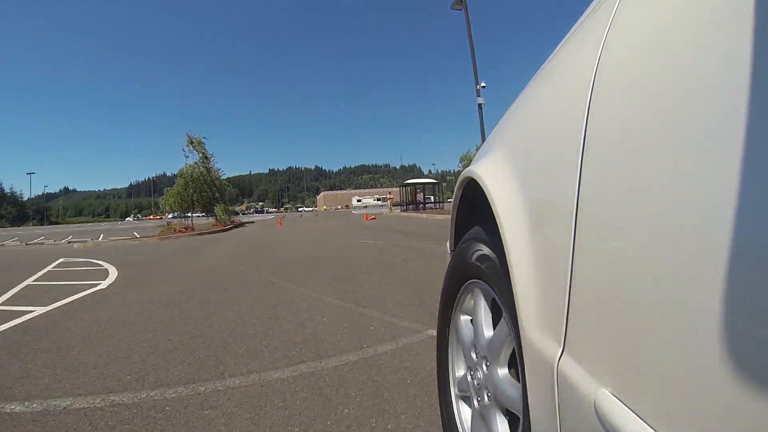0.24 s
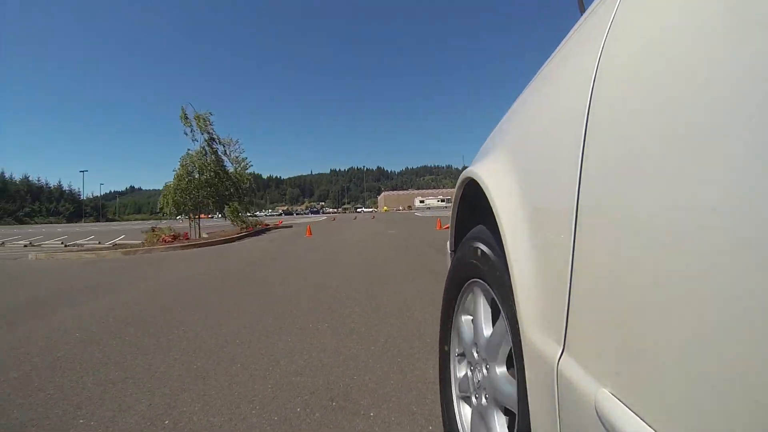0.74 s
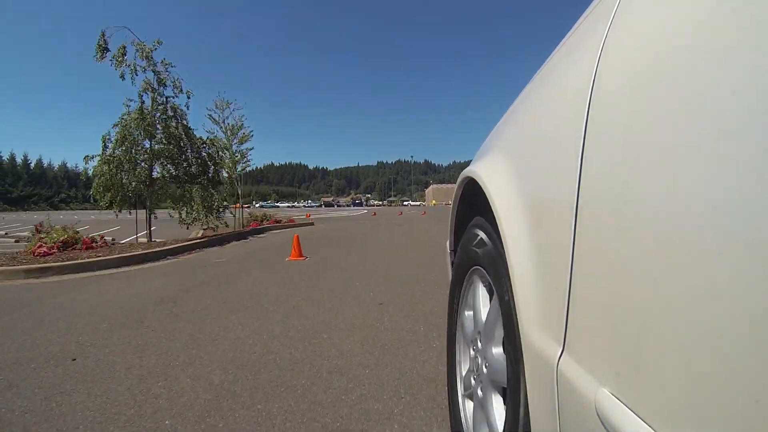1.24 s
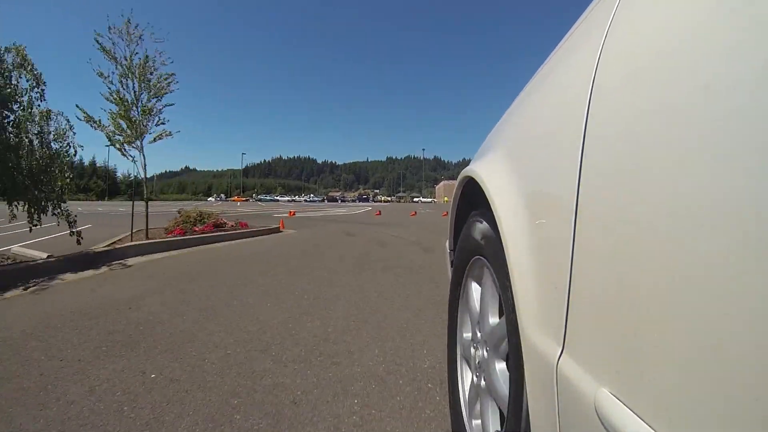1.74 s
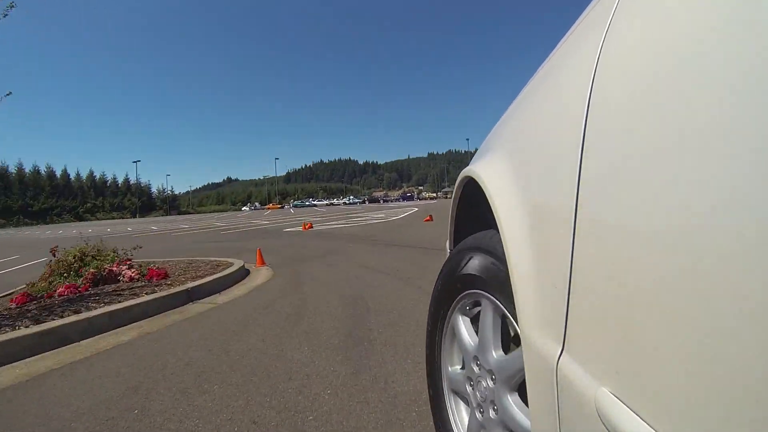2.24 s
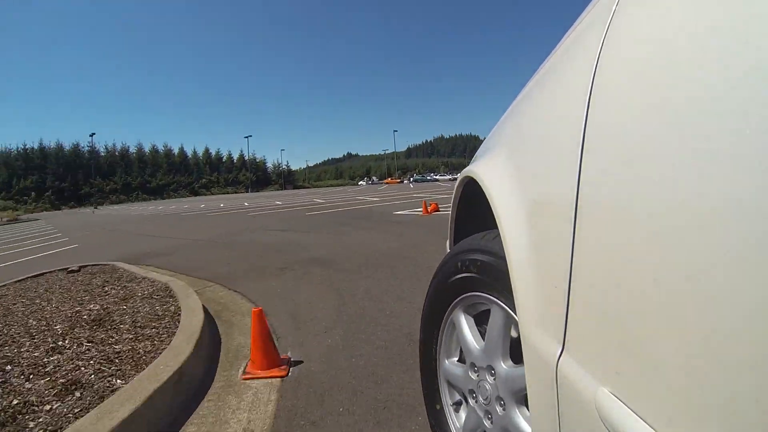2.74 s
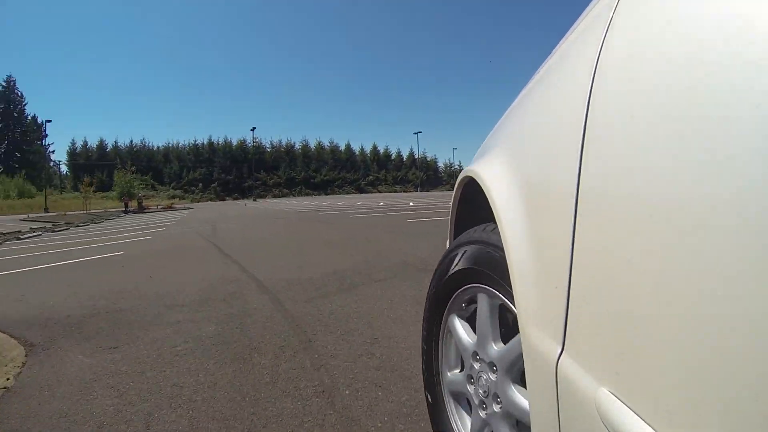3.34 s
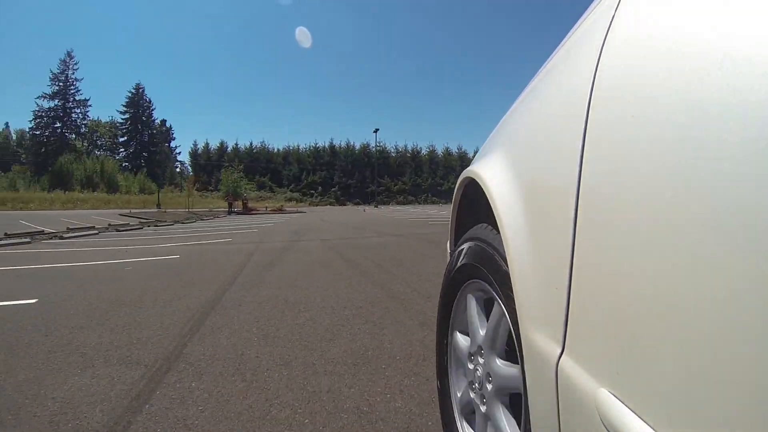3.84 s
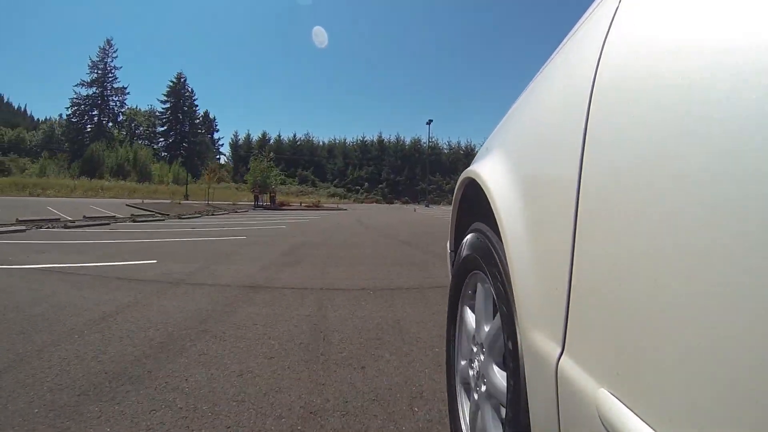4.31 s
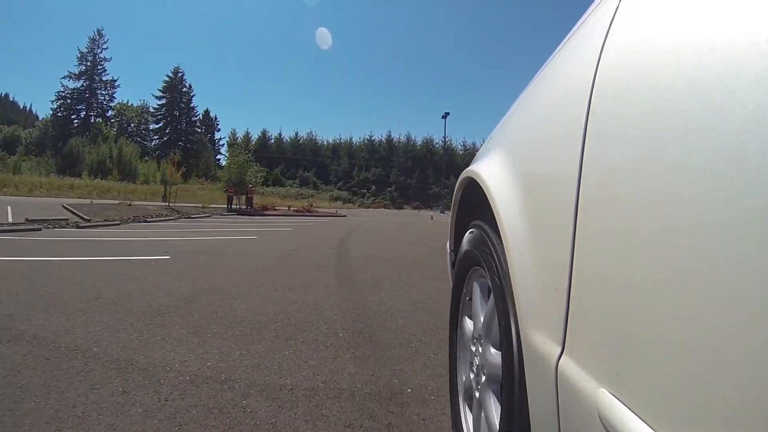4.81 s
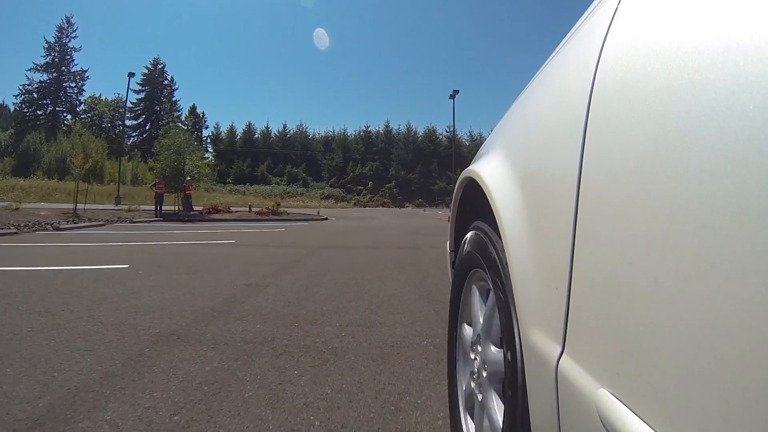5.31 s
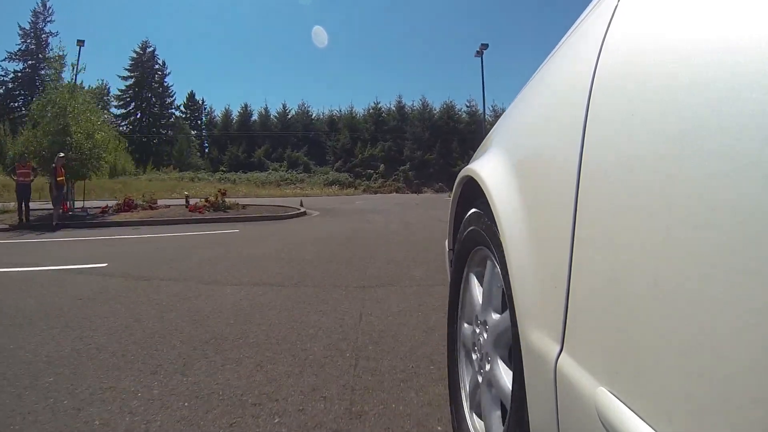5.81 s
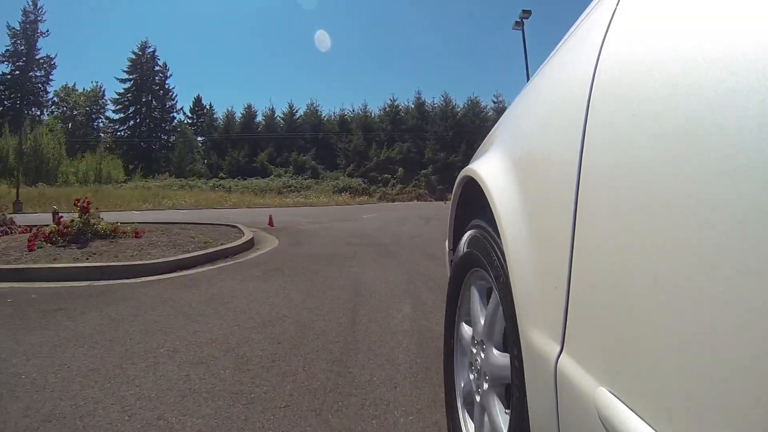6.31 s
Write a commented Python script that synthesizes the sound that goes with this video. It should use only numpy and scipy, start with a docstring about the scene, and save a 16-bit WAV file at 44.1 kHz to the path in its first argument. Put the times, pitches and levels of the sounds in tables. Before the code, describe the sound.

A car rushes around a paved lot, heavy low buffeting dominating, as tyres squeal briefly and an engine hum rises and falls on the straight.

```python
"""A deep, throbbing rumble under tread roar and air hiss, as a car is driven hard round cones on asphalt.
It is heard from a cased camera on the car's side, behind a front wheel.
The tyres squeal through one tight corner, then the engine pulls up the straight and grit ticks on the body.
Squeal and engine are wandering sine tones; the ticks are short decays of noise.
Roar, hiss, sand and wind are noise coloured by the case, and the mount is two noise-driven modes."""
import sys
import numpy as np
from scipy import signal
from scipy.fft import rfft, irfft, next_fast_len
from scipy.io import wavfile
from scipy.ndimage import uniform_filter1d

SR = 44100
rng = np.random.default_rng(int(sys.argv[2]) if len(sys.argv) > 2 else 0)


def int16_out(signal):
    """Quantize to a 16-bit WAV file."""
    q = np.round(np.clip(np.atleast_2d(signal).T, -1, 1) * 32767)
    wavfile.write(sys.argv[1], SR, q.astype(np.int16))


N = 289296

# Slip of the loaded tyre in the tight corner. Each row: time in seconds, pitch in Hz, level in dB.
TYRE_SLIP = [(2.08, 830, -58.5), (2.17, 836, -30), (2.48, 824, -31.5), (2.6, 812, -22.5), (2.73, 830, -21),
             (2.88, 825, -24.5), (2.945, 803, -21.5), (3.04, 816, -25), (3.1, 850, -34), (3.16, 893, -29.5),
             (3.28, 866, -34), (3.38, 850, -45.5), (3.8, 845, -51)]
# Ribs of tread that slide together. Each row: pitch ratio, level in dB, slow pitch wander as a share,
# fast pitch jitter as a share, flutter in dB, extra octave in dB.
TREAD_RIBS = [(1.0, -1.5, 0.00682, 0.011, 2.5, -1), (1.045, -11, 0.0138, 0.0202, 5, -2),
              (.985, -15, 0.01794, .02, 3.5, 9)]
# Single tread modes that sing out in the bends.
# Each row: middle in seconds, length in seconds, pitch in Hz, peak in dB before flutter.
SINGING_MODES = [(0.1, 1.8, 914, -49.5), (2.604, 3.8, 1492, -39), (2.79, 0.23, 1486, -25.5),
                 (3.184, 0.33, 1480, -33.5), (6.482, 0.84, 893, -47)]
# Engine drone. Each row: time in seconds, pitch in Hz, level in dB; pitch and level then waver.
ENGINE_DRONE = [(3.5, 196.4, -67), (3.75, 207, -39), (4.1, 216, -35.5), (4.35, 224.2, -39),
                (4.8, 250.5, -37), (5.2, 256, -56), (5.58, 239, -42), (5.97, 206, -38.5), (6.2, 189.6, -73)]
# Grit thrown against the body. Each row: time in seconds, strength in dB before a common trim.
GRIT_HITS = [(1.3089, -49), (1.3907, -39), (1.4744, -44), (1.7419, -46), (2.2736, -33), (4.1979, -34),
             (5.5844, -30), (6.031, -24)]
# Rush of road and air, rising with speed and throttle. Each row: time in seconds, dB relative to cruising.
RUSH_CURVE = [(0, -4), (0.27, -6.5), (0.42, -2), (0.9, -1.5), (1.02, 3), (1.55, 2), (2.45, -0.5), (2.9, -1),
              (3.1, -4), (3.6, -1.5), (4.35, 0.5), (4.72, 5), (5.48, 7), (5.63, 5.5), (5.73, 0.5),
              (6.02, 1), (6.4, -4.5), (6.56, -2.5)]
# Moments when the roar thins. Each row: middle in seconds, length in seconds, loss of rush in dB.
ROAR_LULLS = [(1.243, 0.1, 5.5), (5.07, 0.11, 4)]
# Wind over the case, rising with the car's speed. Each row: time in seconds, level in dB before flutter.
WIND_CURVE = [(0, -35), (0.7, -34), (1.4, -31.5), (2.4, -34), (3.5, -35), (4.3, -32.5), (4.7, -28.5),
              (5.6, -28), (5.75, -31.5), (6.56, -36)]
# Turbulence at the mount, as the drive of its boom under the gusts. Each row: time in seconds, drive in dB.
TURBULENCE_CURVE = [(0, -22.5), (1.25, -26.5), (1.6, -19), (2.15, -28.5), (2.35, -17.5), (3.0, -15),
                    (4.4, -18.5), (5.2, -18), (5.8, -28), (6.3, -22), (6.56, -36)]
# Gusts that throb in the mount. Each row: middle in seconds, peak drive in dB.
GUST_THROBS = [(0.67, -17), (1.5, -20.5), (1.72, -19), (2.32, -20.5), (2.62, -15.5), (2.73, -12.5),
               (3.1, -13.5), (3.33, -13.5), (3.98, -8.5), (4.5, -15), (4.66, -14), (4.92, -11), (5.1, -9.5),
               (5.511, -12), (5.66, -15)]
# Slow sway of the mount. Each row: time in seconds, drive in dB.
SWAY_CURVE = [(0, -17.5), (0.65, -22), (0.8, -9.5), (1.35, -21), (2.65, -20), (3.0, -11.5), (3.5, -19),
              (4.25, -10.5), (4.7, -16), (6.56, -14)]

# Noise colours ahead of the case. Each row: frequency in Hz, relative level in dB per Hz.
TICK_SPECTRUM = [(4500, -29), (6200, 1), (7200, 1.5), (9000, -4), (11500, -17), (13500, -17)]  # one crack of grit
TREAD_SPECTRUM = [(500, -22.5), (1000, -17), (1230, 2.5), (1520, -1), (1800, -2.5), (2300, -3.5),
                  (2570, -15.5), (3600, -18), (4200, -25), (7000, -58.5)]
HISS_SPECTRUM = [(2000, -6.5), (3700, 3), (4300, -7), (5000, -1.5), (5750, 0.5), (6050, -8), (6550, -6),
                 (7100, -13.5), (7800, -16.5), (8300, -13), (9800, -25), (11400, -24.5), (12300, -39),
                 (14000, -40.5)]
TOP_SPECTRUM = [(4500, -36.5), (6200, -6.5), (7500, -4), (9000, -3.5), (11500, -8), (13500, -16.5)]  # fine sand peppering the body, and the faint air at the top
WIND_SPECTRUM = [(60, -4), (120, -1.5), (170, -2), (260, -2.5), (380, -4), (500, -11), (750, -11),
                 (1100, -11.5), (2500, -37), (8000, -66.5)]
RUMBLE_SPECTRUM = [(12, -4.5), (30, -7.5), (45, 4.5), (62, 5.5), (74, -3.5), (88, 0.5), (102, -8),
                   (135, -18), (400, -68.5)]
# Resonances of the camera case. Each row: frequency in Hz, width in Hz, boost in dB.
CASE_RESONANCES = [(314.7, 34.5, 9.5), (1150, 40, 0), (1423, 67, 3), (1564, 100, 5.5), (3147, 75, 7.5),
                   (3700, 89, 0.5), (4700, 130, 1), (5430, 290, 2.5)]

# the overtones grow with slip and are strongest with the octave on a resonance of the tyre
FULL_SLIP_DB, BITE_DB, BITE_FOLLOWS = -23.5, -3, 0.85
TYRE_RING_HZ, TYRE_RING_WIDTH_HZ = 1633, 180
SCRUB_DB = -11  # rubber dragged over the stones, relative to the slip level
# each layer at cruising (dB), and the share of the rush that it follows
TREAD_DB, TREAD_FOLLOWS = -33.5, 0.77
HISS_DB, HISS_FOLLOWS = -47, 1.1
SAND_DB, SAND_FOLLOWS = -76, 1.2
AIR_FLOOR_DB = -79.5  # a faint steady hiss of air at the top, at any speed
SWAY_MODE, BOOM_MODE = (21, 2.65), (64.16, 5.4)  # drive of each mount mode: centre Hz, half-width Hz
GUST_S = 0.26  # from calm to calm
CEILING = 0.84  # the recorder rounds off peaks near this height
CUTOFF_HZ = 13850


def from_db(db):
    """Decibels to gain."""
    return 10 ** (np.asarray(db) / 20)


def rms_one(x):
    """Scale to unit power."""
    return x / np.sqrt(np.mean(x ** 2) + 1e-20)


def in_time(rows):
    """Each column of a curve, joined by straight lines, at every sample."""
    s, *columns = np.transpose(rows)
    t = np.arange(N) / SR
    return [np.interp(t, s, column) for column in columns]


def during(rows, fade_s=0.019):
    """One over the span of a curve, fading at its ends."""
    t = np.arange(N) / SR
    to_nearest_end = np.minimum(t - rows[0][0], rows[-1][0] - t)
    return np.clip(to_nearest_end / fade_s, 0, 1)


def swell(middle_s, length_s):
    """A smooth rise and fall of height one."""
    position = (np.arange(N) / SR - middle_s) / length_s
    return np.cos(np.pi * np.clip(position, -.5, .5)) ** 2


def noise(gain_at):
    """Unit-power noise whose gain is a function of frequency."""
    size = next_fast_len(N)
    hz = np.arange(size // 2 + 1) * SR / size
    white = rfft(rng.standard_normal(size))
    return rms_one(irfft(white * gain_at(np.maximum(hz, 1)), size)[:N])


def drift(rate_hz):
    """Chance wandering of spread 1, mostly slower than the given rate."""
    return noise(lambda hz: 1 / (1 + (hz / rate_hz) ** 4))


def cased_noise(spectrum):
    """Noise of a given spectrum, coloured by the resonances of the case."""
    points_hz, points_db = np.transpose(spectrum)

    def gain_at(hz):
        source_db = np.interp(np.log(hz), np.log(points_hz), points_db)
        case_db = sum(db / (1 + (2 * (hz - f) / width) ** 2) for f, width, db in CASE_RESONANCES)
        return from_db(source_db + case_db)

    return noise(gain_at)


def squeal():
    """A leading rib, two weaker ones that beat against it, and the lone tread modes."""
    ribs = 0
    for ratio, db, wander, jitter, flutter_db, octave_db in TREAD_RIBS:
        ribs = ribs + from_db(db) * sliding_rib(ratio, wander, jitter, flutter_db, octave_db)
    return ribs + sum(singing(*row) for row in SINGING_MODES)


def sliding_rib(ratio, wander, jitter, flutter_db, octave_db):
    """Harder slip brings out the overtones of a rib, until the pitch leaves the tyre's resonance."""
    hz, level_db = in_time(TYRE_SLIP)
    off_ring = 2 * (2 * hz - TYRE_RING_HZ) / TYRE_RING_WIDTH_HZ
    bite_db = BITE_DB + BITE_FOLLOWS * (level_db - FULL_SLIP_DB) - 20 * np.log10(1 + off_ring ** 2)
    phase = stick_slip(hz * ratio, wander, jitter)
    partials_db = [0, bite_db + octave_db, bite_db - 29, bite_db - 33.5]
    tone = 0
    for harmonic, db in enumerate(partials_db, 1):
        tone = tone + from_db(db + flutter_db * drift(59)) * np.sin(harmonic * phase)
    return during(TYRE_SLIP) * from_db(level_db) * np.sqrt(2) * tone


def singing(middle_s, length_s, hz, peak_db):
    """A single tread mode swells and fades, fluttering as it slides."""
    tone = np.sin(stick_slip(hz, wander=0.00852, jitter=0.0137))
    return swell(middle_s, length_s) * from_db(peak_db + 4.9 * drift(50)) * tone


def stick_slip(hz, wander, jitter):
    """Phase of a tread block that grips and lets go; the stones of the road jog its pitch."""
    pitch = hz * (1 + wander * drift(21.8) + jitter * drift(132.0))
    return 2 * np.pi * np.cumsum(pitch) / SR


def engine(wobble=0.0065):
    """The firing tone and its octave climb on the straight and sink as the throttle closes."""
    hz, level_db = in_time(ENGINE_DRONE)
    phase = 2 * np.pi * np.cumsum(hz * (1 + wobble * drift(16.0))) / SR
    tone = np.sin(phase) + from_db(-14) * np.sin(2 * phase)
    return during(ENGINE_DRONE) * from_db(level_db + 2.3 * drift(5.1)) * rms_one(tone)


def grit(decay_s=0.00086):
    """Each stone gives one dry crack that is gone in a few milliseconds."""
    t, envelope = np.arange(N) / SR, np.zeros(N)
    for s, strength_db in GRIT_HITS:
        age = t - s
        decay = np.exp(-np.clip(age / decay_s, 0, 20))
        envelope += from_db(strength_db - 7) * (age >= 0) * decay
    return envelope * cased_noise(TICK_SPECTRUM)


def road_and_air():
    """Tread, hiss and sand follow the rush over a faint steady air; a sliding tyre scrubs; wind blows on the case."""
    (wind_db,), (rush_db,), (_, slip_db) = in_time(WIND_CURVE), in_time(RUSH_CURVE), in_time(TYRE_SLIP)
    rush_db = rush_db - sum(db * swell(s, length_s) for s, length_s, db in ROAR_LULLS)
    flutter = drift(38) + .5 * drift(7.3)  # the same eddies shake tread, hiss and wind
    scrub = during(TYRE_SLIP) * from_db(slip_db + SCRUB_DB)

    # the parts of a layer add as powers
    tread_gain = np.hypot(from_db(TREAD_DB + TREAD_FOLLOWS * rush_db + 0.8 * flutter), scrub)
    hiss_gain = np.hypot(from_db(HISS_DB + HISS_FOLLOWS * rush_db + 1.3 * flutter), from_db(-32) * scrub)
    sand_gain = from_db(SAND_DB + SAND_FOLLOWS * rush_db + 3.9 * drift(300))
    top_gain = np.hypot(sand_gain, from_db(AIR_FLOOR_DB))

    tread = tread_gain * cased_noise(TREAD_SPECTRUM)
    hiss = hiss_gain * cased_noise(HISS_SPECTRUM)
    sand_and_top_air = top_gain * cased_noise(TOP_SPECTRUM)
    wind = from_db(wind_db + 0.97 * flutter) * cased_noise(WIND_SPECTRUM)
    return tread + hiss + sand_and_top_air + wind


def mount(unrest_db=1.0):
    """The mount sways, and booms with every gust, over a broad rumble that follows both in smoothed form."""
    (sway_db,), (bed_db,) = in_time(SWAY_CURVE), in_time(TURBULENCE_CURVE)
    gust_power = sum((from_db(db) * swell(s, GUST_S)) ** 2 for s, db in GUST_THROBS)
    bed_power = from_db(bed_db + unrest_db * drift(8.2)) ** 2
    boom_db = 10 * np.log10(bed_power + gust_power)

    sway = shaken(SWAY_MODE, sway_db + 1.2 * drift(6.2) - 1.1, evenness=1.0, skirt=2.29)
    boom = shaken(BOOM_MODE, boom_db - .4, evenness=0.59, skirt=1.22)
    force_db = uniform_filter1d((sway_db + boom_db) / 2, size=SR // 6)
    return sway + boom + from_db(force_db - 6.0) * cased_noise(RUMBLE_SPECTRUM)


def shaken(mode, level_db, evenness, skirt):
    """A mode driven by turbulence; damping evens out its swings and it cannot change abruptly."""
    centre, width = mode
    swing = signal.hilbert(noise(lambda hz: 1 / (1 + ((hz - centre) / width) ** 2)))
    evened = rms_one(swing.real / (np.abs(swing) + 0.038) ** np.clip(evenness, 0, 1))
    lowpass = signal.butter(4, centre * skirt, fs=SR, output="sos")
    return signal.sosfilt(lowpass, from_db(level_db) * evened)


def scene():
    """Everything meets at one microphone in the open air."""
    return (squeal() + engine() + grit() + road_and_air() + mount())[None]


def record(dry):
    """The strongest throbs are rounded and the top is cut."""
    rounded = dry / (1 + np.abs(dry / CEILING) ** 8) ** (1 / 8)
    top_cut = signal.ellip(10, .1, 80, CUTOFF_HZ, fs=SR, output="sos")
    return signal.sosfilt(top_cut, rounded)


dry = scene()
out = record(dry)
int16_out(out)
```